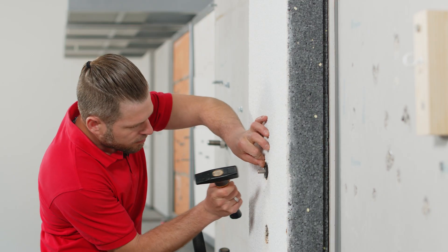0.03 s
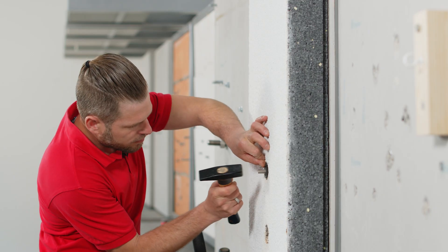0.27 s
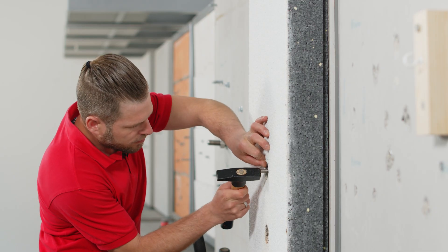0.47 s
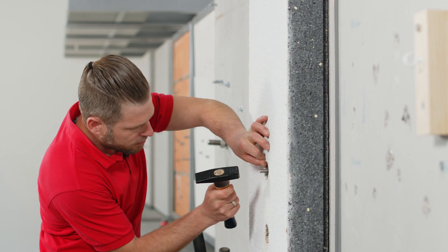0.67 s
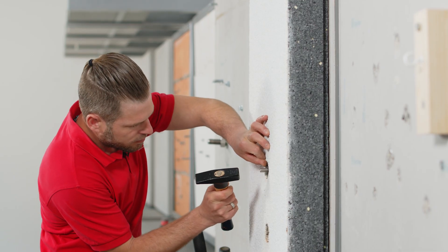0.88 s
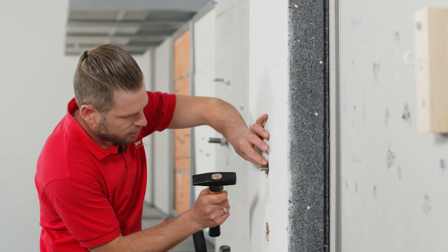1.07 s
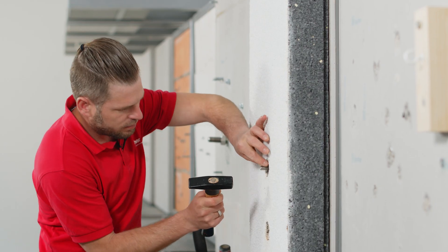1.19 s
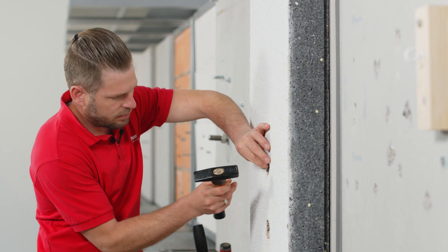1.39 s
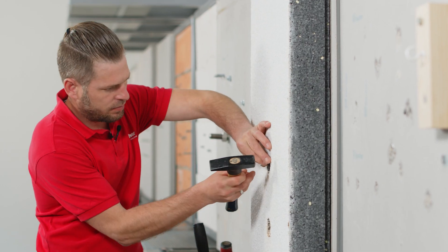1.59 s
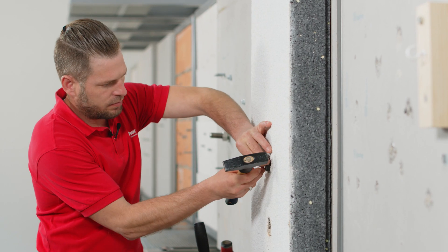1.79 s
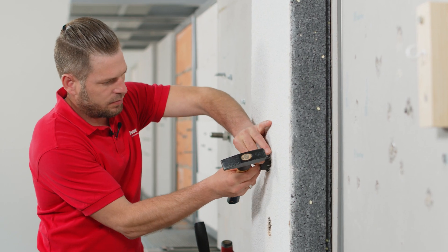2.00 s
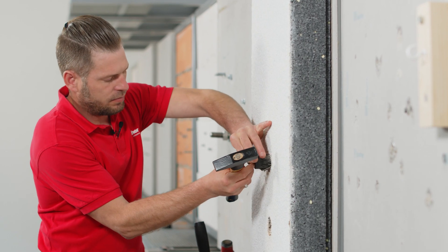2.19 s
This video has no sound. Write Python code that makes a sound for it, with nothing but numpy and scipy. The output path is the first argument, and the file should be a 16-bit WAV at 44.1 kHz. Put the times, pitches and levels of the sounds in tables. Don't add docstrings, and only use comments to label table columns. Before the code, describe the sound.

Hammer blows on a steel rod in a brick wall, heard close in a bare, echoing building. An earlier strike is dying away at the start. Sharp, short metallic cracks land at 0.2 and 0.53 seconds, each with rapid bounces and a slight high ring. The hall tail fades over about a second; from 1.4 to 2.25 seconds come very quiet gritty rubs, scrapes, slides and ticks over faint low background noise.

```python
import sys
import numpy as np
from scipy import signal
from scipy.fft import rfft, irfft
from scipy.io import wavfile
from scipy.ndimage import uniform_filter1d

SR = 44100
rng = np.random.default_rng(int(sys.argv[2]) if len(sys.argv) > 2 else 0)


def natural_amplitude(level_db):
    exponent = np.asarray(level_db, float) / 20
    return 10 ** exponent


def bounce(signal):
    frames = np.transpose(np.atleast_2d(signal))
    limited = np.clip(frames, -1, 1)
    pcm = np.round(limited * 32767).astype(np.int16)
    wavfile.write(sys.argv[1], SR, pcm)


N = 99225
LEAD = 8820

# (frequency [Hz], level [dB])
FLOOR_SPECTRUM = [(18, -36.5), (30, -1.5), (204, -3.5), (486, -19.5), (684, -11), (1130, -14.5),
                  (1220, -22), (7270, -36), (16000, -33)]

# (frequency [Hz], t60 [s])
HALL_T60 = [(60, 2.1), (160, 1.2), (420, 1.21), (1100, 1.176), (2900, 1.04), (5000, 0.69), (8000, .65),
            (15000, 0.2)]
# (frequency [Hz], level [dB])
HALL_SPECTRUM = [(40, -11.5), (140, -7.5), (330, -16.5), (600, -10), (1200, -7), (3500, -21), (9000, -30),
                 (15500, -32.5)]
# (frequency [Hz], width [Hz], level [dB])
HALL_RESONANCES = [(136.6, 12, 11.5), (930, 88, 8), (1397, 100, 5.5), (2940, 300, 2), (4820, 220, 8.5),
                   (7100, 200, 7.5)]

# (time [s], length [s], level [dB])
RUBS = [(1.51, .015, -73), (1.555, 0.029, -65), (1.595, 0.011, -60), (1.745, 0.04, -62),
        (1.797, 0.011, -54), (1.82, 0.018, -76.5), (1.903, .014, -57), (1.93, 0.043, -67.5),
        (2.01, 0.043, -65.5), (2.106, 0.046, -68.5), (2.195, 0.016, -74), (2.228, .03, -64)]
# (time [s], length [s], level [dB], brightness [dB/octave])
SCRAPES = [(1.386, 0.017, -58.5, 1), (1.512, 0.0056, -60.5, 4.5), (1.598, .018, -44.5, -0.5),
           (1.748, .04, -60.5, 1.5), (1.796, 0.019, -41.5, 0.5), (1.825, 0.018, -55.5, 1.5),
           (1.911, 0.064, -48, -2.5), (1.934, 0.0219, -45, 2), (1.965, 0.017, -64, 2.5),
           (2.02, 0.015, -41.5, -1.5), (2.138, 0.032, -43, -4.5), (2.225, 0.032, -39.5, 1.5)]
# (time [s], length [s], level [dB])
SLIDES = [
    (1.917, 0.035, -56.5),
    (2.05, 0.0484, -47.5),
    (2.102, 0.046, -42),
]
CLICK_TIMES = [1.462, 1.738, 1.746, 1.851, 2.074, 2.099, 2.198, 2.214]
CLICK_LEVELS = [-69, -63.5, -67, -70.5, -59.5, -56, -66, -70]
TICK_TIMES = [1.515, 1.601, 1.806, 1.946, 2.021, 2.23, 2.238]
TICK_LEVELS = [-72, -72, -52, -53.5, -70, -46, -46]
# (frequency [Hz], level [dB])
GRIT_SPECTRUM = [(2000, -18), (3500, -5), (5000, -6.5), (7000, -1), (10000, -3), (12000, -11.5),
                 (15500, -12.5)]
DRAG_SPECTRUM = [(60, -23.5), (135, 10), (300, 0), (700, -2), (1050, -8), (1500, -15), (2500, -23.5),
                 (5000, -40)]
SLIDE_SPECTRUM = [(100, 6), (200, -10), (400, -3), (700, 1), (1050, 0.5), (1400, -15.5), (2500, -19.5),
                  (5000, -35.5)]
TICK_SPECTRUM = [(800, -4), (1800, 11.5), (2600, -6), (3800, 9), (5200, -2.5), (6500, -5), (10000, -10),
                 (15000, -30)]

BLOW_TIMES = [
    -.11,
    .2097,
    .2427,
    .2697,
    .5264,
    .534,
]
# (strength [dB], chatter [s], brightness [dB/octave], hall share [dB], wall thud [dB])
BLOWS = [(-9.5, .006, -1, -0.5, -4.5), (-6.5, 0.0071, 0, 3, 3.5), (-11, 0.004, -.5, -8.5, 1),
         (-23, .004, -1.3, 1.5, -5.5), (-6, 0.0067, 1, 2.5, 4), (-14.5, .01, -0.87, 6, 4)]
# (frequency [Hz], level [dB], t60 [s])
ROD_MODES = [(557, -15.5, 0.021), (668, -14.5, 0.034), (846, -7, 0.017), (982, -2, 0.031),
             (1155, -4.5, 0.018), (1325, -0.5, 0.02), (1452, -3.5, .018), (1770, -13.5, 0.036),
             (2200, -18.5, 0.0069), (2660, -18.5, 0.024), (3170, -23, 0.0095)]
# (frequency [Hz], level [dB], t60 [s])
WALL_MODES = [(73.5, -32, .15), (132.15, -28, 0.38), (275, -26, .06), (423, -23.5, 0.087)]
HEAD_HZ = (9540, 10720)
# (level [dB], t60 [s])
HEAD_DECAYS = [(-38.5, 0.19), (-41, 0.27)]
# (frequency [Hz], level [dB])
CRACK_SPECTRUM = [(2000, -10.5), (3000, -1.5), (3800, -0.5), (4800, 5), (6000, -6.5), (7600, 6),
                  (12500, -8.5), (15500, -7)]


def read(points, hz):
    f, value = np.transpose(points)
    return np.interp(np.log(hz + 1), np.log(f + 1), value)


def evened(x):
    return x / np.sqrt(np.mean(x ** 2) + 1e-20)


def add(mix, s, sound):
    part = mix[LEAD + round(s * SR):][:len(sound)]
    part += sound[:len(part)]


def tinted(x, points, tilt_db=0):
    hz = np.fft.rfftfreq(len(x), 1 / SR)
    edge_db = -24 * np.maximum(np.log2(points[0][0] / (hz + 1)), 0)
    db = read(points, hz) + edge_db + tilt_db * np.log2((hz + 30) / 500)
    return irfft(rfft(x) * natural_amplitude(db), len(x))


def head_tilt(k, tilt_db):
    return (2 * k - 1) * tilt_db * 3


def noise_floor():
    return natural_amplitude(-65) * evened(tinted(rng.standard_normal(N), FLOOR_SPECTRUM))


def hall_tail(colour=1, tilt_db=0):
    rise_s, head_db = 0.0043, 12
    hz, t, z = signal.stft(rng.standard_normal(2 * SR), SR, nperseg=1024)
    db = read(HALL_SPECTRUM, hz) + tilt_db * np.log2(1 + hz / 2000)
    for f, width, top_db in HALL_RESONANCES:
        db = db + top_db * np.exp(-((hz - f) / width) ** 2)
    for k, f in enumerate(HEAD_HZ):
        db = db + (head_db + head_tilt(k, tilt_db)) * (abs(hz - f) < SR / 2048)
    decay_db = -60 * t / read(HALL_T60, hz)[:, None]
    h = signal.istft(z * natural_amplitude(colour * db[:, None] + decay_db), SR, nperseg=1024)[1]
    h = h * (1 - np.exp(-np.arange(len(h)) / SR / rise_s))
    return h / np.sqrt(np.mean(h[:SR // 10] ** 2))


def friction(length, level_db, colour, tilt_db=0, release=.007, grain=1):
    edge_s, grain_db, sway_db = 0.0027, 4, 1
    t = np.arange(8192) / SR
    noise = rng.standard_normal((8192, 3))
    lumps_db = grain_db * evened(uniform_filter1d(noise[:, 1], size=30))
    lumps_db = lumps_db + sway_db * evened(uniform_filter1d(noise[:, 2], size=250))
    grains = evened(tinted(noise[:, 0] * natural_amplitude(grain * lumps_db), colour, tilt_db))
    rise = np.minimum(t / min(edge_s, length / 2), 1)
    return natural_amplitude(level_db) * rise * np.exp(-np.maximum(t - length, 0) / release) * grains


def handling():
    hands = np.zeros(N + LEAD)
    dull = dict(release=0.0087, grain=0.65)
    click_s, tick_s, tick_release_s = 0.0031, .004, 0.0031
    for s, length, db in RUBS:
        add(hands, s, friction(length, db, GRIT_SPECTRUM))
    for s, length, db, tilt_db in SCRAPES:
        add(hands, s, friction(length, db, DRAG_SPECTRUM, tilt_db, **dull))
    for s, length, db in SLIDES:
        add(hands, s, friction(length, db, SLIDE_SPECTRUM, **dull))
    for s, db in zip(CLICK_TIMES, CLICK_LEVELS):
        add(hands, s, friction(click_s, db, GRIT_SPECTRUM, release=click_s / 2))
    for s, db in zip(TICK_TIMES, TICK_LEVELS):
        add(hands, s, friction(tick_s, db, TICK_SPECTRUM, release=tick_release_s))
    return hands


def ring(modes, t, rise_s, tilt_db=0):
    total = 0
    for k, (hz, db, t60) in enumerate(modes):
        level = natural_amplitude(db + tilt_db * np.log2(hz / 1000) - 60 * t / t60)
        total = total + (-1) ** k * level * np.sin(2 * np.pi * hz * t)
    return (1 - np.exp(-t / rise_s)) * total


CONTACT_S = 0.00031


def struck_rod(t, chatter_s, tilt_db):
    chatter_per_s, chatter_db, grip_s = 2000, -5, 0.0029
    draw = rng.random((len(t), 2))
    knocks = (draw[:, 0] < chatter_per_s / SR) * (t < chatter_s) * (2 * draw[:, 1] - 1) * natural_amplitude(chatter_db)
    knocks[0] = 1
    rod = signal.fftconvolve(knocks, ring(ROD_MODES, t, CONTACT_S, 0.9 * tilt_db))[:len(t)]
    swing = np.sqrt(uniform_filter1d(rod ** 2, size=90) + 1e-6)
    grip = np.exp(-np.maximum(t - chatter_s, 0) / grip_s)
    return grip * rod / np.maximum(swing, swing[60] / 4)


def contact_crack(t, chatter_s, tilt_db):
    crack_db, fade_s, grip_s = -8, .012, .0028
    noise = evened(tinted(rng.random(len(t)) - .5, CRACK_SPECTRUM))
    fade = np.exp(-t / fade_s - np.maximum(t - chatter_s, 0) / grip_s)
    return natural_amplitude(crack_db + 2 * tilt_db) * (1 - np.exp(-t / CONTACT_S)) * noise * fade


def hammer_head(t, tilt_db):
    beat_hz, beat_depth = 45, .6
    modes = [(hz, db + head_tilt(k, tilt_db), t60)
             for k, (hz, (db, t60)) in enumerate(zip(HEAD_HZ, HEAD_DECAYS))]
    return ring(modes, t, CONTACT_S) * (1 + beat_depth * np.cos(2 * np.pi * beat_hz * t))


def blow(strength_db, chatter_s, tilt_db, thud_db):
    near_db, near_t60, wall_rise_s = -16, .07, 0.0017
    t = np.arange(SR // 3) / SR
    rod = struck_rod(t, chatter_s, tilt_db) + contact_crack(t, chatter_s, tilt_db)
    near = natural_amplitude(near_db - 60 * t / near_t60) * rng.standard_normal(len(t)) / np.sqrt(SR / 200)
    near[0] = 1
    rod = signal.fftconvolve(rod, near)[:len(t)]
    thud = ring(WALL_MODES, t, wall_rise_s, -thud_db / 2)
    return natural_amplitude(strength_db) * (rod + hammer_head(t, tilt_db) + thud)


def scene():
    hall_db, hand_wet_db = -27, -12
    hands = handling()
    wet = signal.fftconvolve(hands, hall_tail(colour=0))[:len(hands)] / np.sqrt(SR / 10)
    mix = hands + natural_amplitude(hand_wet_db) * wet
    for s, (db, chatter_s, tilt_db, send_db, thud_db) in zip(BLOW_TIMES, BLOWS):
        add(mix, s, blow(db, chatter_s, tilt_db, thud_db))
        add(mix, s, natural_amplitude(hall_db + db + send_db) * hall_tail(tilt_db=tilt_db))
    return (mix[LEAD:] + noise_floor())[None]


def low_pass(x):
    return signal.sosfilt(signal.butter(12, 16820, fs=SR, output="sos"), x)


def record(dry):
    ceiling, low_hz, high_hz = .88, 40, 15600
    held = dry / (1 + abs(dry / ceiling) ** 6) ** (1 / 6)
    held = signal.sosfilt(signal.butter(1, low_hz, "high", fs=SR, output="sos"), held)
    held = signal.sosfilt(signal.butter(10, high_hz, fs=SR, output="sos"), held)
    return low_pass(held)


dry = scene()
out = record(dry)
bounce(out)
```